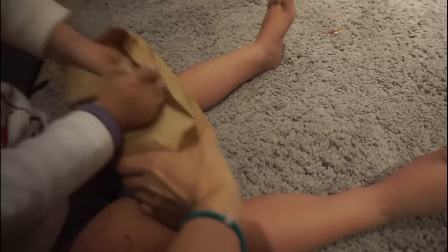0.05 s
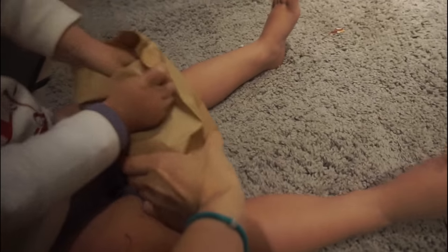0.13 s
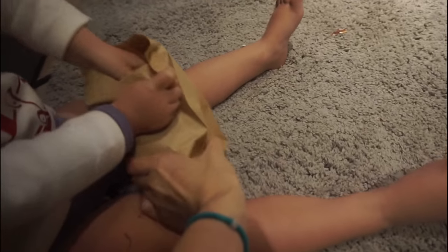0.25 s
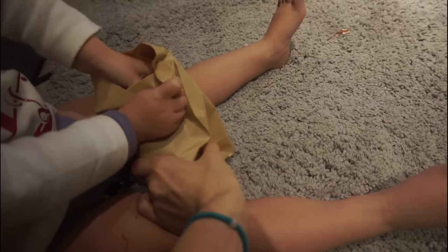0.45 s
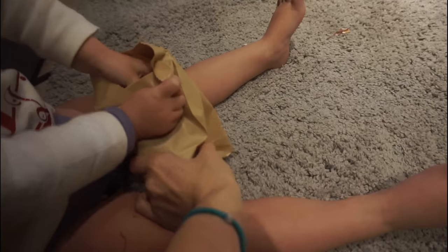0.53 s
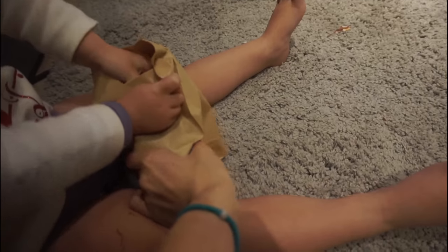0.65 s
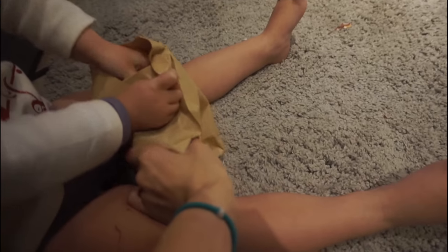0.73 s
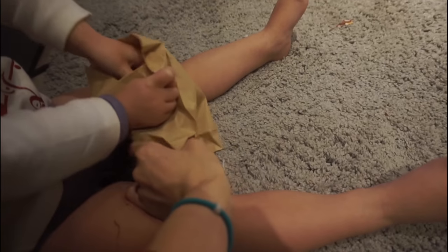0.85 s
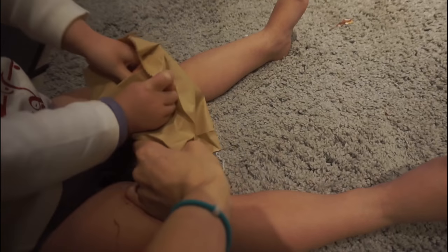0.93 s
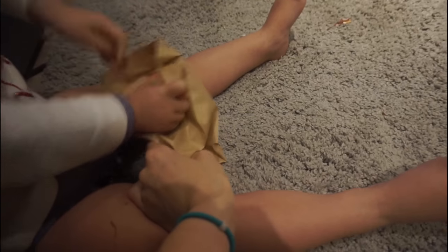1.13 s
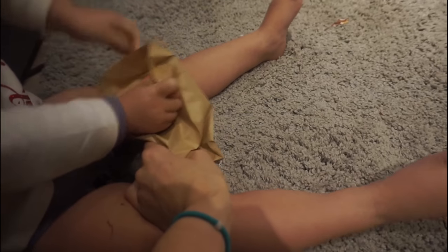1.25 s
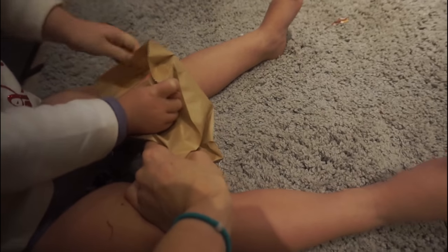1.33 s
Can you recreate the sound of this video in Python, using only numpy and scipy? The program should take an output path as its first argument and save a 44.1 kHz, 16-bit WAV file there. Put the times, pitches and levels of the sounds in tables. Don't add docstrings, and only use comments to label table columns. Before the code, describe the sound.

Hands scrunch and pull open a stiff paper bag indoors, crackling faintly at first, then much louder.

```python
import sys
import numpy as np
from scipy import signal
from scipy.fft import rfft, irfft
from scipy.io import wavfile
from scipy.ndimage import uniform_filter1d

SR = 44100
rng = np.random.default_rng(int(sys.argv[2]) if len(sys.argv) > 2 else 0)


def volts_from_decibels(level):
    exponent = np.asarray(level, float) / 20
    return 10 ** exponent


def bounce(signal):
    frames = np.transpose(np.atleast_2d(signal))
    limited = np.clip(frames, -1, 1)
    pcm = np.round(limited * 32767).astype(np.int16)
    wavfile.write(sys.argv[1], SR, pcm)


N = 61739

# f/Hz, density level/dB
AIR_COLOUR = [(18, -57), (30, -18), (144, 3), (843, 15), (1690, 19.5), (2650, -4), (4140, -26),
              (10200, -13), (11500, -31), (15000, -73), (22000, -120)]
# f/Hz, density level/dB
PAPER_COLOUR = [(71, -69), (120, -28), (656, 6.5), (1700, -2), (2800, 0.5), (3330, -12), (4180, -8.5),
                (10700, -10.5), (11500, -34), (15000, -53), (22000, -120)]
# f/Hz, width/Hz, level/dB
BAG_HOLLOWS = [(585, 590, -0.5), (2550, 930, -1.5), (4150, 1300, -3.5), (4760, 57, -28)]
# t/s, crackle level/dB
GRIP_LEVEL = [(0, -59), (.18, -61.5), (.25, -50.5), (.35, -51.5), (.45, -49.5), (.58, -52.5), (.66, -44.5),
              (.78, -42.5), (0.921, -47), (1.061, -49), (1.15, -43), (1.26, -52.5), (1.32, -58.5),
              (1.4, -58)]
# t/s, peak level/dB, ring f/Hz
PANEL_POPS = [(0.025, -36, 693), (0.127, -35.5, 768), (0.206, -34.5, 580), (0.216, -41, 633),
              (0.279, -43.5, 560), (0.375, -27, 714), (0.386, -27, 934), (0.405, -28.5, 810),
              (0.418, -26, 1140), (0.46, -36, 850), (0.488, -32, 690), (0.514, -24, 663), (0.63, -21, 648),
              (0.676, -23.5, 625), (0.69, -25.5, 1100), (0.734, -30, 1300), (0.749, -20.5, 853),
              (0.764, -23.5, 860), (0.821, -25, 1200), (0.873, -16, 739), (0.8825, -24, 723),
              (0.925, -37.5, 524), (0.949, -40, 880), (0.994, -24, 892), (1.103, -27.5, 590),
              (1.118, -16.5, 880), (1.13, -29, 960), (1.166, -28.5, 714), (1.234, -26.5, 734),
              (1.319, -35, 700)]
# t/s, peak level/dB, ring f/Hz, treble share/dB, left-right/dB
CREASE_SNAPS = [(0.0251, -31.5, 1570, -54, 0), (0.1097, -28, 2200, -28, 9.5), (0.1258, -31.5, 1570, -39, 0),
                (0.2064, -18, 3230, -5, 8.5), (0.2158, -43.5, 4130, 6, 7), (0.2303, -34, 3100, -20, -9),
                (0.3786, -25, 2560, -39, 0), (0.3862, -31, 1700, -25, 17), (0.4191, -15.5, 2160, -55, 0),
                (0.4569, -23.5, 3140, -7.5, 2), (0.4617, -28.5, 2540, -4, 4),
                (0.5135, -16.5, 2740, -12, 7.5), (0.523, -55, 2360, -28, -2), (0.5324, -32.5, 2380, -34, 4),
                (0.6, -19, 2230, -9, 0.5), (0.6239, -24.5, 2090, -36, -4), (0.6322, -33, 1990, -37, -12),
                (0.6364, -35, 2430, -31, -17), (0.6453, -16.5, 2780, -14.5, 0),
                (0.6554, -25.5, 2120, -31, 4), (0.6742, -22, 2040, -30, -1), (0.6852, -25, 2740, -14, 11),
                (0.6904, -47, 2790, -22, -12), (0.6994, -14, 1710, -40, -2),
                (0.735, -28, 1520, -32, -8), (0.7493, -13, 2630, -9.5, 6), (0.7534, -10.5, 2700, -21, 4.5),
                (0.7644, -11.5, 2440, -49, 1), (0.823, -11, 2000, -11.5, 3), (0.8265, -48, 1970, 9, 7),
                (0.8375, -24, 1830, -15, 3), (0.8532, -25, 2170, -3, 1), (0.8723, -19.5, 1490, -5, 0),
                (0.8803, -16, 4150, -2.5, 6), (0.9822, -39, 5000, -13, 13), (0.9944, -31.5, 1510, -38, -2),
                (0.9998, -33, 4070, -50, 11), (1.0496, -37, 2470, -16, 14), (1.0905, -29.5, 6500, -9, 15),
                (1.1033, -24.5, 2120, -5.5, 1.5), (1.1236, -14, 2420, -22, 4), (1.1318, -30.5, 2630, -2, 5),
                (1.167, -40, 2660, -18, 10), (1.1754, -36, 2280, -23, 4), (1.1841, -25.5, 2700, -12, 10),
                (1.2221, -35.5, 3240, 6, 14.5), (1.2303, -21, 2670, -4.5, 6), (1.237, -28.5, 2400, -28, 6)]
# t/s, peak level/dB, ring f/Hz
FOLD_TICKS = [(.1108, -34, 3880), (.2068, -26, 5900), (.2071, -24.5, 1520), (.2074, -27, 2360),
              (.2490, -40, 2400), (0.269, -39, 2200), (.2760, -43, 4000), (.2875, -33, 2280),
              (0.3, -38.5, 2650), (.3170, -45, 4100), (.3790, -35.5, 4900), (.5148, -19, 4700),
              (.5195, -24, 2380), (.6458, -27, 4230), (.7505, -32, 9400), (.7548, -19, 5030),
              (.8236, -14, 4200), (0.8455, -33, 1400), (0.858, -31, 2190), (.8813, -16.5, 2620),
              (.8818, -13, 4000), (.8945, -26, 1560), (.9830, -24.5, 4540), (0.996, -34, 3240),
              (1.0030, -24, 2500), (1.0912, -21, 5500), (1.167, -29.5, 2620), (1.1848, -26, 2670),
              (1.2310, -32, 9400)]
# t/s, length/s, rms level/dB, centre f/Hz, treble share/dB
WRINKLE_CRUNCHES = [
    (0.218, .012, -39, 4400, -15),
    (0.461, 0.0068, -33.5, 2640, -4),
    (.6260, 0.018, -35.5, 1980, -14),
    (0.836, 0.0077, -30, 2710, -11),
    (.9990, 0.0046, -35.5, 3280, -16),
    (1.116, 0.0098, -35.5, 2700, -1),
    (1.1300, 0.01, -34, 2330, -3),
    (1.171, .010, -39, 2130, -9),
    (1.2280, 0.012, -35, 2500, -10),
]
# t/s, peak level/dB, ring f/Hz
MORE_PANEL_POPS = [(.2295, -39.5, 1050), (.2800, -43, 1020), (.3020, -46, 780), (.3075, -50, 840),
                   (.3360, -44.5, 683), (.5185, -29.5, 756), (.5290, -33, 720), (.5500, -39.5, 696),
                   (.5830, -42, 670), (.8225, -27, 629), (0.8564, -32.5, 760), (.8930, -37, 745),
                   (.9130, -41, 670), (.9320, -40.5, 760), (1.0025, -28.5, 700), (1.0480, -40, 820),
                   (1.0950, -41, 755), (1.1510, -44, 770), (1.1770, -33, 983), (1.2020, -37, 940)]
# t/s, peak level/dB, ring f/Hz
PANEL_THUDS = [
    (.630, -32.5, 356),
    (0.461, -42, 458),
    (.750, -27, 509),
    (0.872, -47.5, 328),
    (1.122, -39, 300),
    (1.232, -41.5, 370),
]
# f/Hz, t60/s
ROOM_DECAY = [(300, 0.56), (800, 0.095), (2100, 0.22), (5500, 0.15), (10000, 0.18)]
# f/Hz, shared part [ratio]
ROOM_SHARED = [(250, 14), (1000, 0.52), (8000, 0.25)]

AIR_DB, ROOM_DB = -63, -8
SPREAD = 0.82
CRACKLE_PER_S, CRACKLE_SPREAD_DB, CRACKLE_DB, RUB_DB = 4000, 3, -3, -5.5
POP_DB, POP_CYCLES, POP_RISE_S, POP_ROUGH, POP_PAN_DB, THUD_PAN_DB = 2, 6.7, 0.0025, 0.4, 3.5, -1
SNAP_DB, SNAP_T60_S, SNAP_RISE_S, SNAP_WIDTH = -2.5, 0.0058, 0.001018, 0.22
SHEET_DB, UPPER_DB, TREBLE_DB, TREBLE_T60_S = -2, -13.5, 10, 0.0064
SHIVER_DB, SHIVER_T60_S, FIZZ_DB, FIZZ_T60_S = -14, 0.039, -18.5, 0.064
BRUSH_S, BRUSH_LEN_S, BRUSH_DB = 0.062, 0.017, -54
TICK_T60_S, TICK_RISE_CYCLES, TICK_ROUGH, TICK_PAN_DB = 0.0037, 1.9, 0.54, 3.5
CRUNCH_PER_S, CRUNCH_SPREAD_DB, CRUNCH_WIDTH, CRUNCH_PAN_DB = 4500, 1.5, 0.45, 3
LAG_S, EDGE_HZ, LOW_HZ = 0.000022, 10993, 300


def evened(x):
    return x / np.sqrt(np.mean(x ** 2) + 1e-20)


def peaked(x):
    return x / (abs(x).max() + 1e-20)


def read(points, hz):
    f, value = np.transpose(points)
    return np.interp(np.log(hz + 1), np.log(f + 1), value)


def colour(x, points):
    size = x.shape[-1]
    hz = np.fft.rfftfreq(size, 1 / SR)
    return irfft(rfft(x) * volts_from_decibels(read(points, hz)), size)


def ring(x, hz, width):
    r = np.exp(-np.pi * width / SR)
    return signal.lfilter([1, 0, -1], [1, -2 * r * np.cos(2 * np.pi * hz / SR), r * r], x)


def fade(t, t60):
    return volts_from_decibels(-60 * t / t60)


def place(mix, s, sound, pan_db):
    part = mix[:, round(s * SR):][:, :sound.shape[-1]]
    part += volts_from_decibels(np.array([[pan_db / 2], [-pan_db / 2]])) * sound[..., :part.shape[1]]


def air():
    z = rng.standard_normal((3, N))
    return volts_from_decibels(AIR_DB) * evened(colour(z[0] + 1.5 * z[1:], AIR_COLOUR))


def crackle():
    size = volts_from_decibels(CRACKLE_SPREAD_DB * np.minimum(rng.exponential(1, N), 3.2))
    size = size * (rng.random(N) < CRACKLE_PER_S / SR)
    size = size * rng.choice([-1., 1.], N)
    patch = rng.integers(0, len(BAG_HOLLOWS) + 1, N)
    side = rng.uniform(4.5, 5, N)
    clumps = volts_from_decibels(3.15 * evened(uniform_filter1d(side - side.mean(), size=300)))
    pair = size * clumps * volts_from_decibels(np.array([side / 2, -side / 2]))
    flat = colour(pair * (patch == len(BAG_HOLLOWS)), PAPER_COLOUR)
    grains = volts_from_decibels(-6.0) * evened(ring(flat, 1620, 2400))
    for k, (hz, width, db) in enumerate(BAG_HOLLOWS):
        hollow = ring(ring(pair * (patch == k), hz, width), hz, hz)
        grains = grains + volts_from_decibels(db - 6.0) * evened(hollow)
    z = rng.standard_normal((3, N))
    rub = evened(colour(z[0] + 1.16 * z[1:], PAPER_COLOUR))
    s, db = np.transpose(GRIP_LEVEL)
    grip = volts_from_decibels(np.interp(np.arange(N) / SR, s, db))
    return grip * (volts_from_decibels(CRACKLE_DB) * evened(grains) + volts_from_decibels(RUB_DB) * rub)


def pop(db, hz, chance):
    t = np.arange(len(chance)) / SR
    shape = (1 - np.exp(-t / POP_RISE_S)) ** 2 * fade(t * hz, POP_CYCLES)
    rough = evened(ring(ring(chance, 1.505 * hz, 0.44 * hz), hz, 2 * hz))
    tone = np.sin(2 * np.pi * hz * t) + POP_ROUGH * rough
    return volts_from_decibels(db + POP_DB) * peaked(tone * shape)


def snap(db, hz, treble_db, chance):
    t = np.arange(chance.shape[1]) / SR
    rise = np.minimum(t / SNAP_RISE_S, 1) ** 2
    after = np.maximum(t - SNAP_RISE_S, 0)
    burst = rise * fade(after, SNAP_T60_S)
    jolt = np.arange(len(t)) == round(SNAP_RISE_S * SR)
    apart = SPREAD * chance[4:]

    fold = ring(burst * chance[0] + 2.44 * jolt, hz, SNAP_WIDTH * hz)
    fold = peaked(ring(fold, hz, 2.75 * hz))
    sheet = ring(colour(chance[1] + apart, PAPER_COLOUR), hz, 2.0 * hz)
    sheet = peaked(sheet * burst)
    upper = ring(chance[1] * burst + jolt, 1.6 * hz, 0.5 * hz)
    upper = peaked(ring(upper, 1.75 * hz, hz))
    grain = volts_from_decibels(6.1 * evened(uniform_filter1d(chance[0], size=70)))
    shiver = evened(ring(colour((chance[3] + apart) * grain, PAPER_COLOUR), hz, 2.1 * hz))
    shiver = shiver * rise * volts_from_decibels(SHIVER_DB) * fade(after, SHIVER_T60_S)
    body = fold + volts_from_decibels(SHEET_DB) * sheet + volts_from_decibels(UPPER_DB) * upper + shiver
    body = signal.lfilter(*signal.butter(2, min(2.62 * hz, SR / 4), fs=SR), body)

    hiss = np.diff(chance[2] + apart, prepend=0)
    hiss = evened(signal.lfilter([1, -1, -1, 1], 1, hiss))
    crack = peaked(hiss * rise * fade(after, TREBLE_T60_S))
    fizz = hiss[:, ::-1] * rise * volts_from_decibels(FIZZ_DB) * fade(after, FIZZ_T60_S)
    return volts_from_decibels(db + SNAP_DB) * (body + volts_from_decibels(treble_db + TREBLE_DB) * (crack + fizz))


def brush():
    t = np.arange(2048) / SR
    slide = np.sin(np.pi * np.clip(t / BRUSH_LEN_S, 0, 1) ** 0.5)
    return volts_from_decibels(BRUSH_DB) * slide * evened(np.diff(rng.standard_normal(2049)))


def folds():
    mix = np.zeros((2, N))
    for s, db, hz, treble_db, pan_db in CREASE_SNAPS:
        place(mix, s, snap(db, hz, treble_db, rng.standard_normal((6, 6144))), pan_db)
    for s, db, hz in PANEL_POPS:
        place(mix, s, pop(db, hz, rng.standard_normal(4096)), POP_PAN_DB)
    for s, db, hz in PANEL_THUDS:
        place(mix, s, pop(db, hz, rng.standard_normal(4096)), THUD_PAN_DB)
    place(mix, BRUSH_S, brush(), POP_PAN_DB)
    return mix


def tick(db, hz, chance):
    t = np.arange(len(chance)) / SR
    turns = t * hz
    shape = (1 - np.exp(-turns / TICK_RISE_CYCLES)) * fade(t, TICK_T60_S)
    tone = np.sin(2 * np.pi * turns) + TICK_ROUGH * evened(ring(chance, hz, hz))
    return volts_from_decibels(db) * peaked(tone * shape)


def crunch(length, db, hz, treble_db, chance):
    t = np.arange(chance.shape[1]) / SR
    size = volts_from_decibels(-CRUNCH_SPREAD_DB * np.log(chance[1] + 0.00082))
    slips = size * np.sign(chance[2] - 0.5) * (chance[0] < CRUNCH_PER_S / SR)
    heard = slips * (1 + SPREAD * (chance[4:] - 0.5))
    patch = np.floor(3 * chance[3])
    body = 0
    for k, part in enumerate([0.6, 1, 1.6]):
        rung = ring(heard * (patch == k), part * hz, CRUNCH_WIDTH * hz)
        body = body + evened(ring(rung, part * hz, hz))
    edge = evened(np.diff(heard + 0.9 * (chance[4:] - 0.5), n=2, prepend=[[0, 0], [0, 0]]))
    swell = np.sin(np.pi * np.clip(t / length, 0, 1) ** 0.62)
    return volts_from_decibels(db) * swell * (evened(body) + volts_from_decibels(treble_db) * edge)


def wrinkles():
    mix = np.zeros((2, N))
    for (s, length, db, hz, treble_db), chance in zip(WRINKLE_CRUNCHES, rng.random((12, 6, 1024))):
        place(mix, s, crunch(length, db, hz, treble_db, chance), CRUNCH_PAN_DB)
    for (s, db, hz), chance in zip(FOLD_TICKS, rng.standard_normal((40, 512))):
        place(mix, s, tick(db, hz, chance), TICK_PAN_DB)
    for (s, db, hz), chance in zip(MORE_PANEL_POPS, rng.standard_normal((40, 2048))):
        place(mix, s, pop(db, hz, chance), POP_PAN_DB)
    return mix


def room(x):
    shape = (3, SR // 2)
    taps = rng.standard_normal(shape) * (rng.random(shape) < 0.06)
    taps = taps * (np.arange(SR // 2) > 60)
    hz, t, z = signal.stft(taps, SR, nperseg=256)
    same = read(ROOM_SHARED, hz)[:, None]
    z = (same * z[0] + z[1:]) / np.sqrt(1 + same ** 2)
    tail = signal.istft(z * fade(t, read(ROOM_DECAY, hz)[:, None]), SR, nperseg=256)[1]
    return signal.fftconvolve(x[None], tail / np.linalg.norm(tail[0]), axes=1)[:, :N]


def scene():
    bag = folds() + crackle() + wrinkles()
    hz = np.fft.rfftfreq(N, 1 / SR)
    lag = LAG_S * np.array([[0], [1]])
    direct = irfft(rfft(bag) * np.exp(-2j * np.pi * hz * lag), N)
    return direct + volts_from_decibels(ROOM_DB) * room(bag.mean(0)) + air()


def band_limit(x):
    return signal.sosfilt(signal.butter(12, 12420, fs=SR, output="sos"), x)


def record(dry):
    low = signal.sosfilt(signal.butter(3, LOW_HZ, "high", fs=SR, output="sos"), dry)
    over = np.fft.rfftfreq(N, 1 / SR) - EDGE_HZ
    edge_db = -32 * np.clip(over / 300, 0, 1) - 0.006 * np.clip(over, 0, None)
    band = irfft(rfft(low) * volts_from_decibels(edge_db), N)
    mix = band + volts_from_decibels(-21) * band ** 2
    return band_limit(mix)


dry = scene()
out = record(dry)
bounce(out)
```